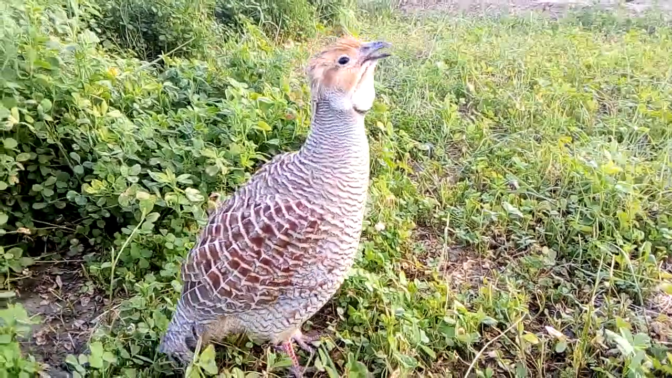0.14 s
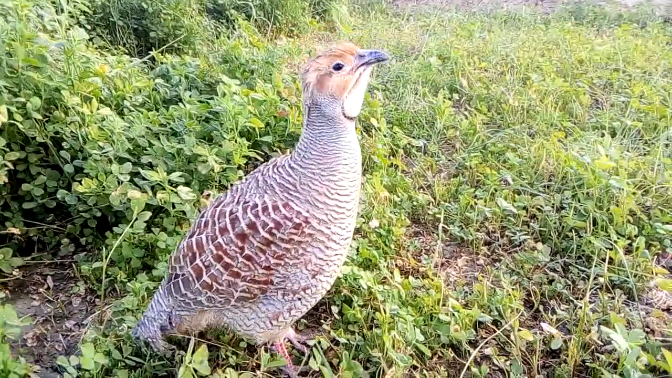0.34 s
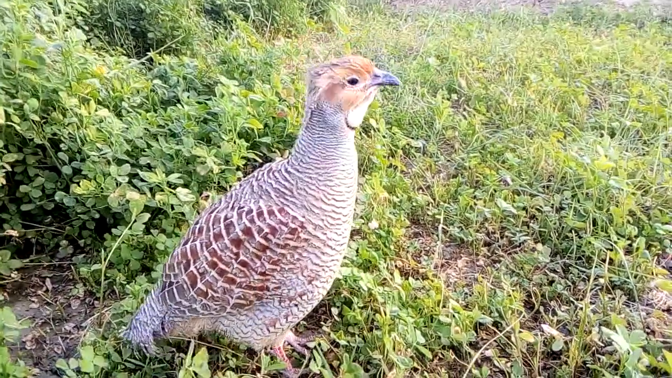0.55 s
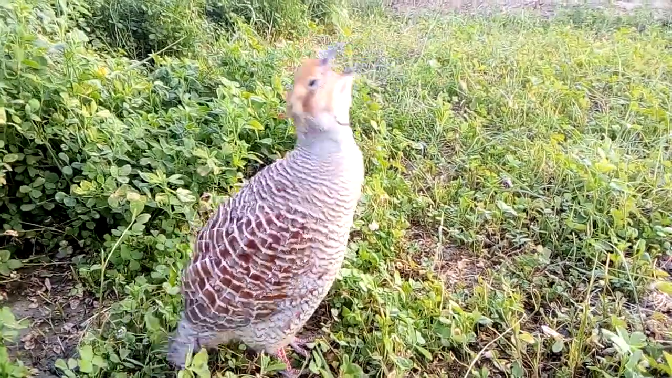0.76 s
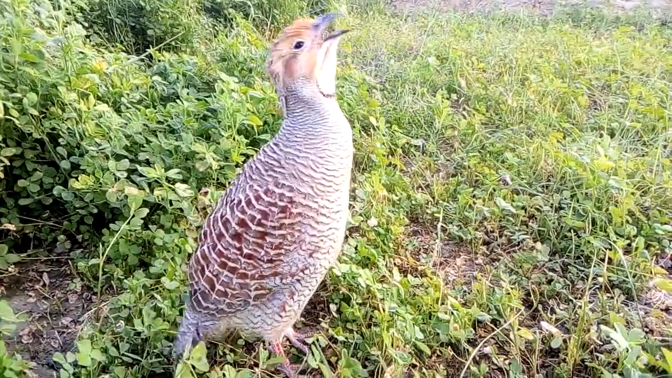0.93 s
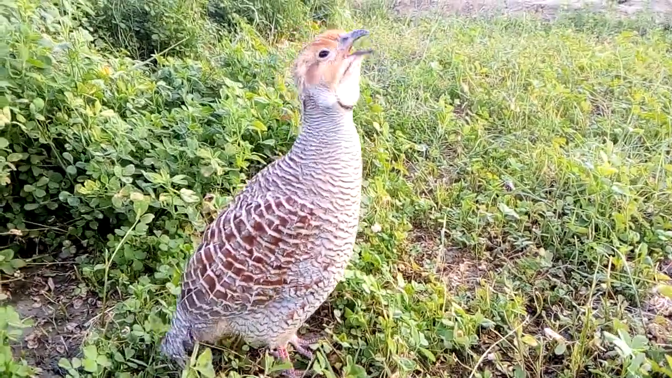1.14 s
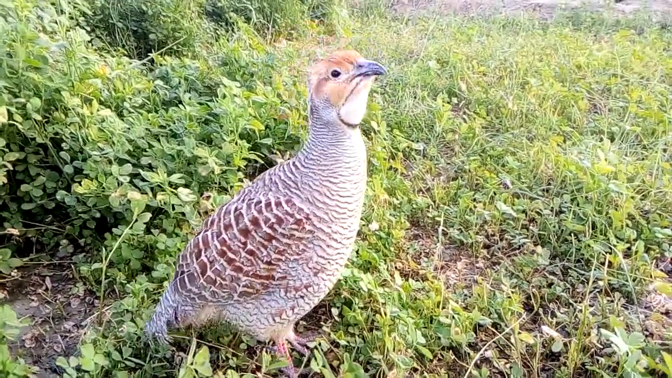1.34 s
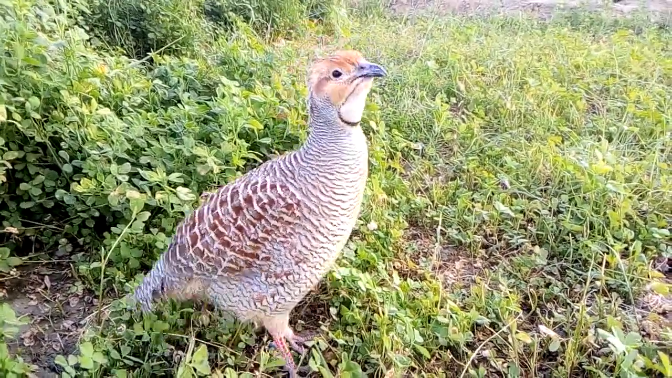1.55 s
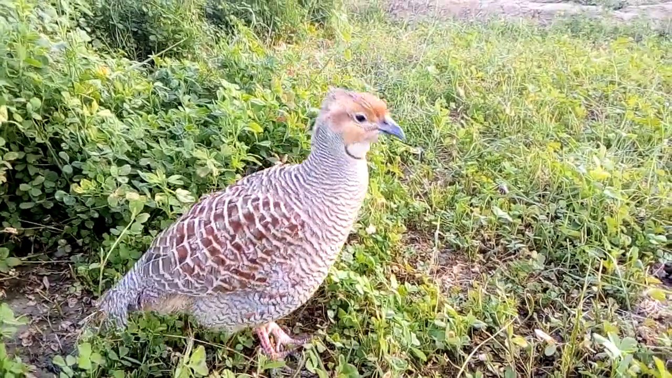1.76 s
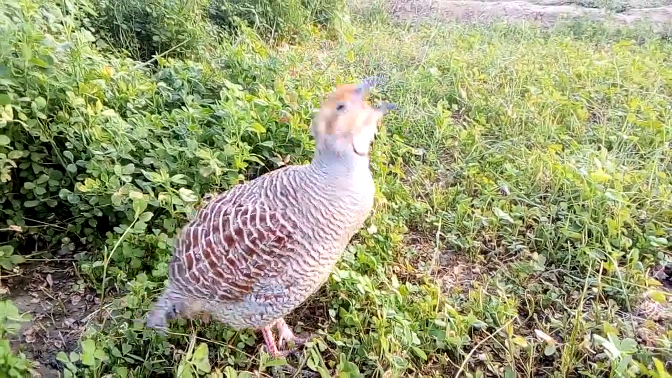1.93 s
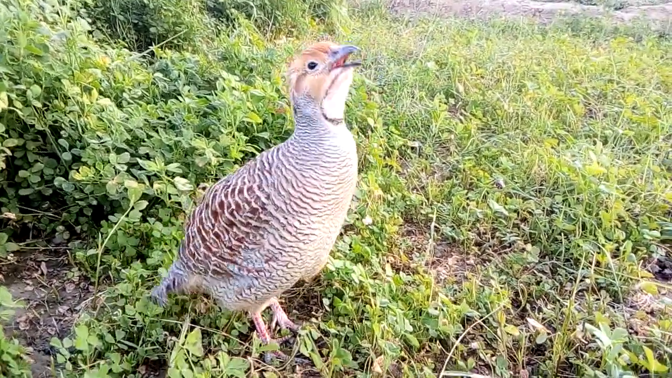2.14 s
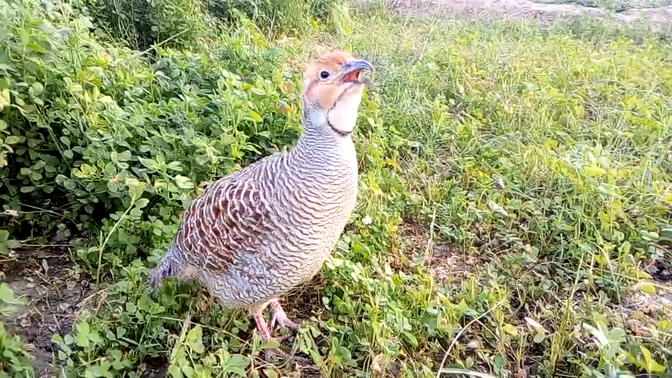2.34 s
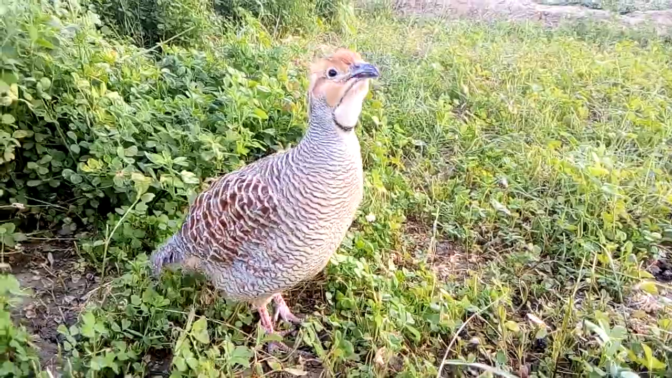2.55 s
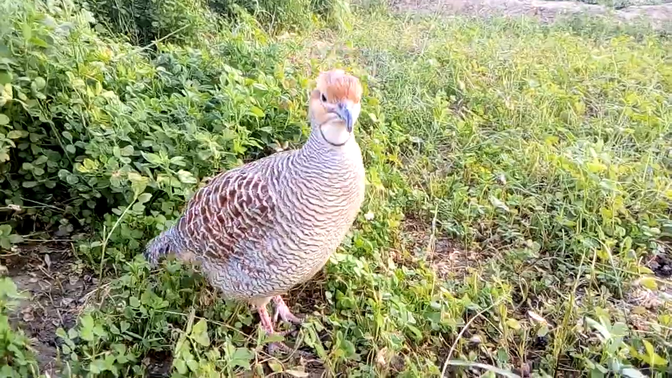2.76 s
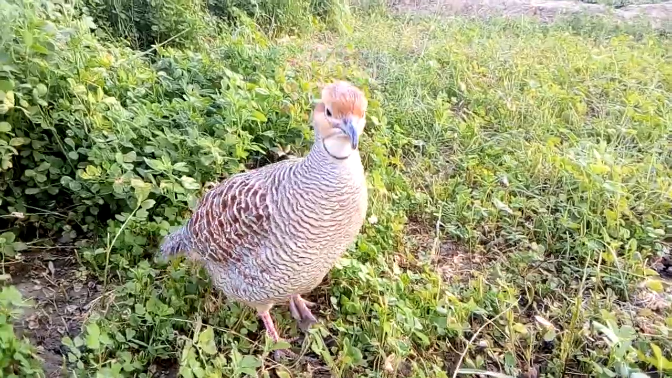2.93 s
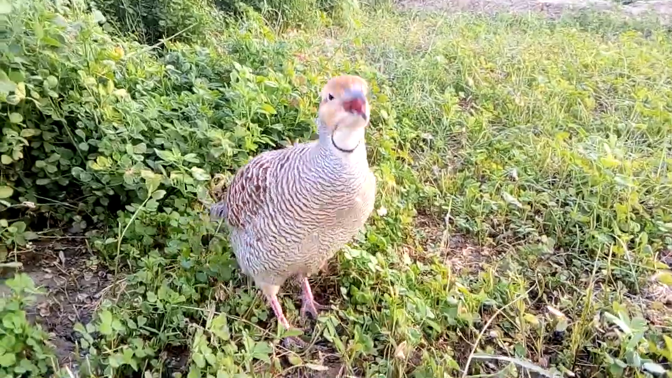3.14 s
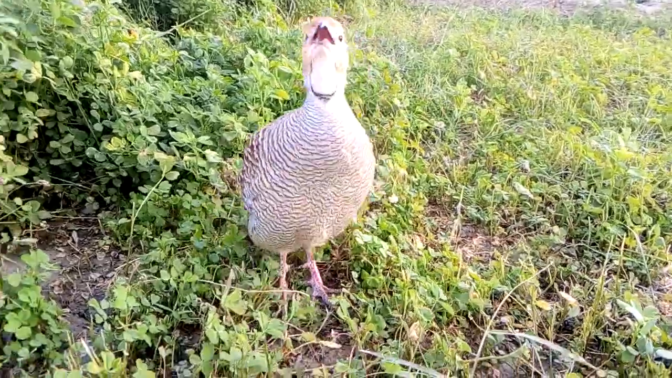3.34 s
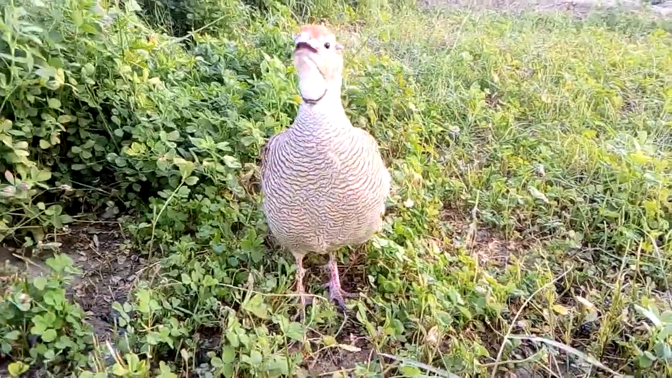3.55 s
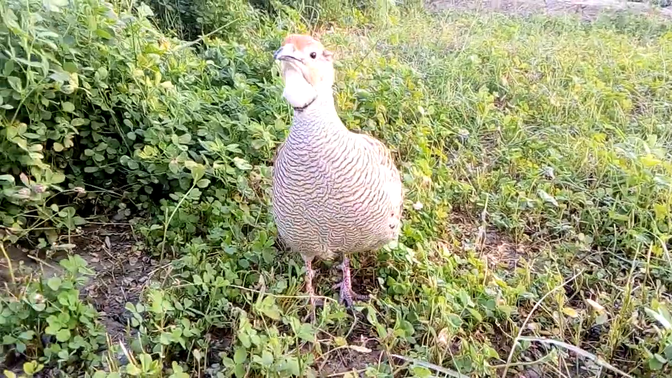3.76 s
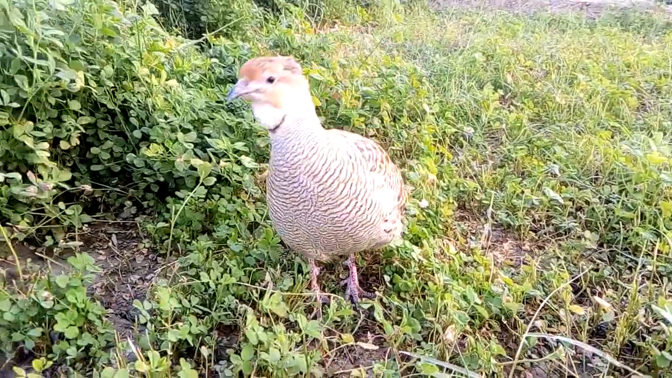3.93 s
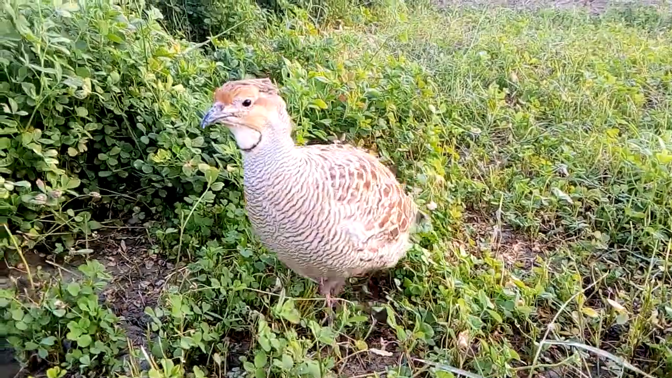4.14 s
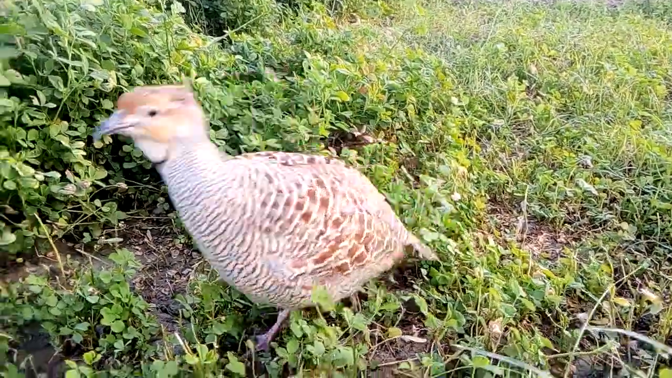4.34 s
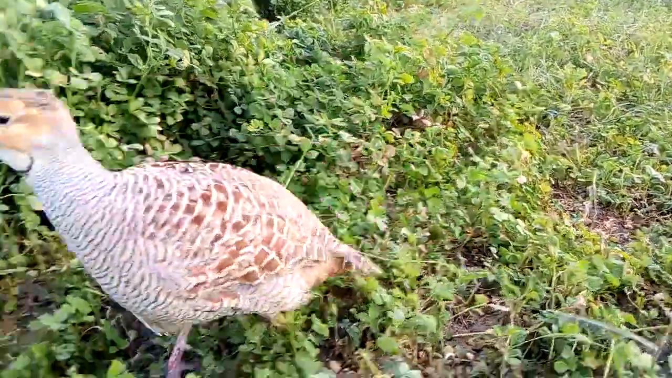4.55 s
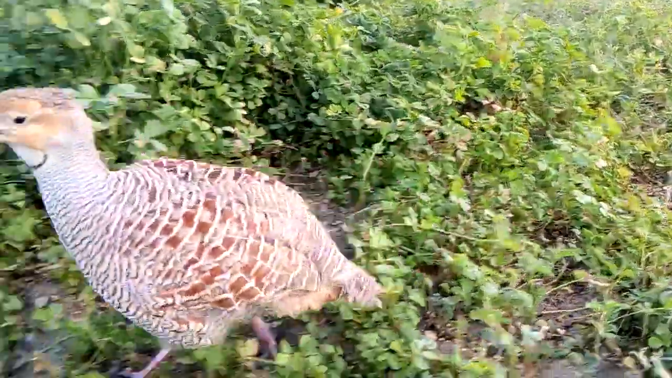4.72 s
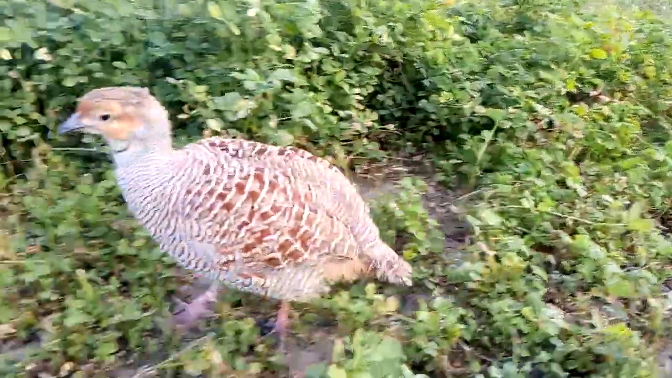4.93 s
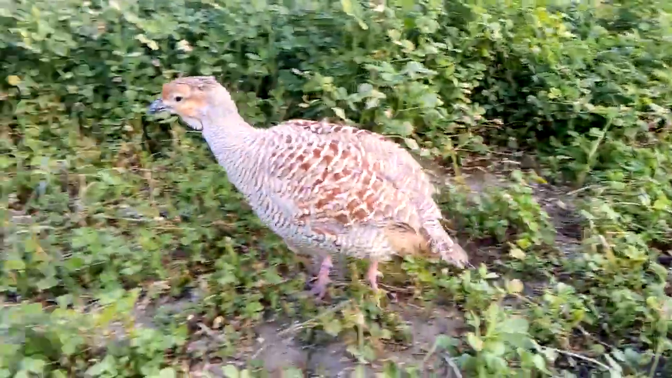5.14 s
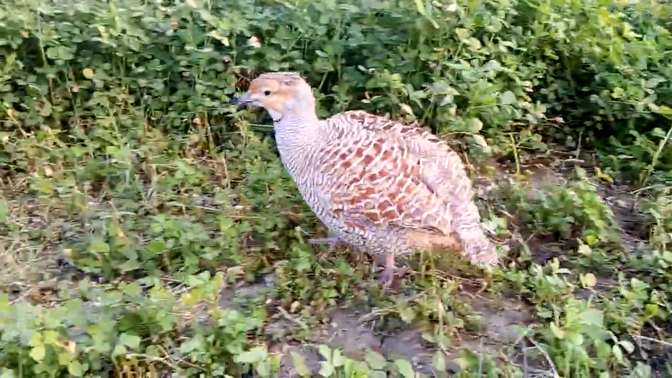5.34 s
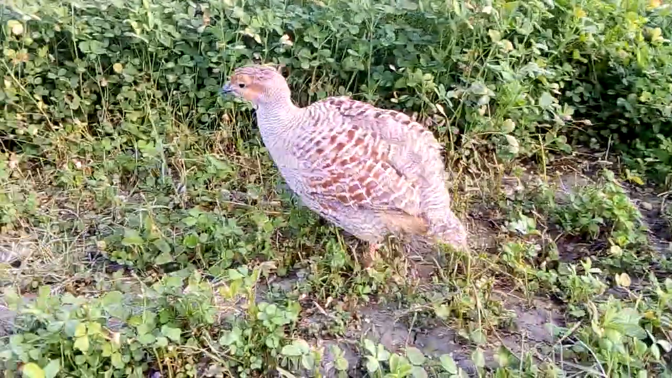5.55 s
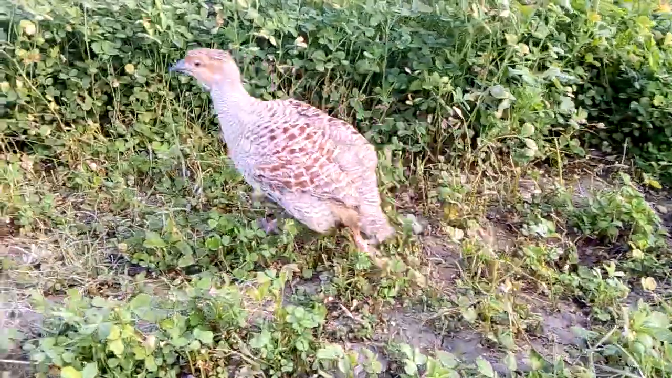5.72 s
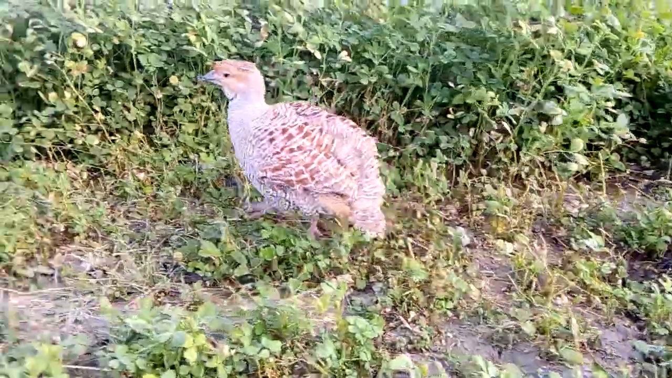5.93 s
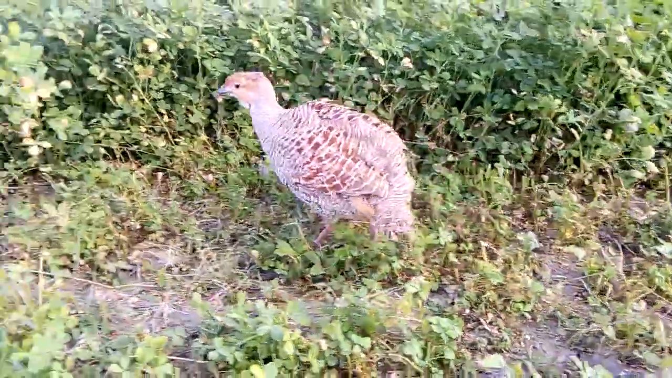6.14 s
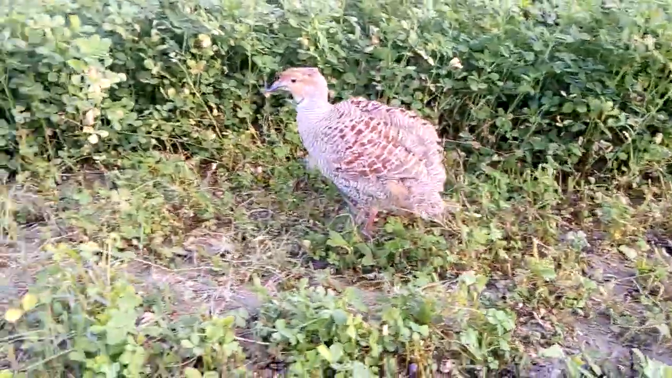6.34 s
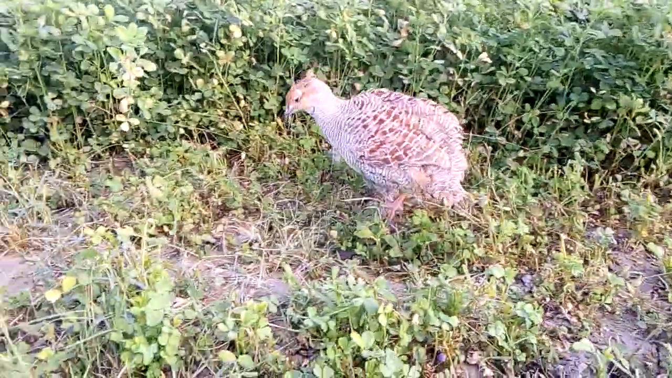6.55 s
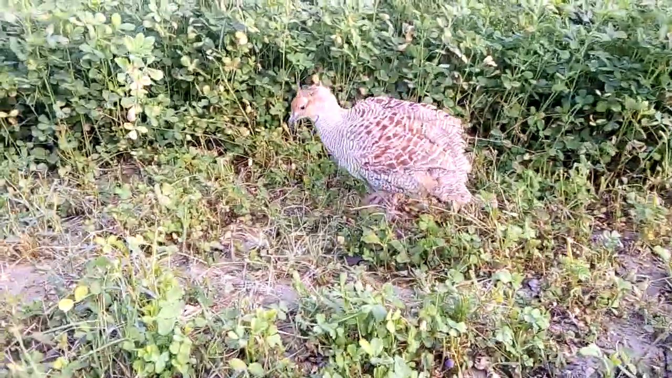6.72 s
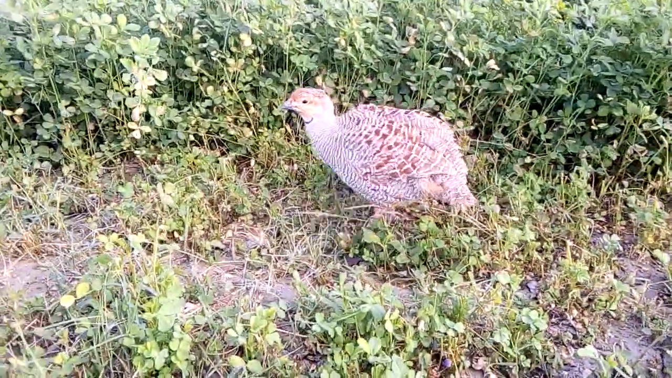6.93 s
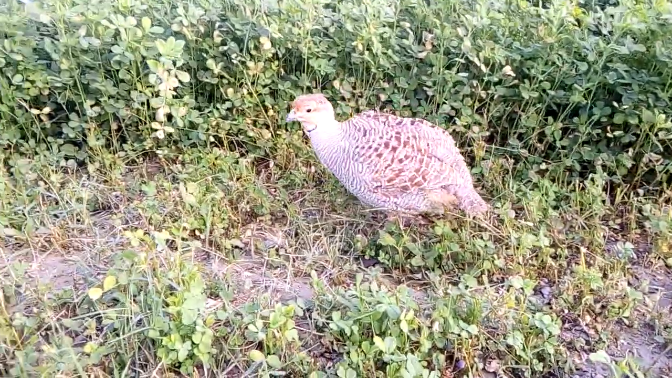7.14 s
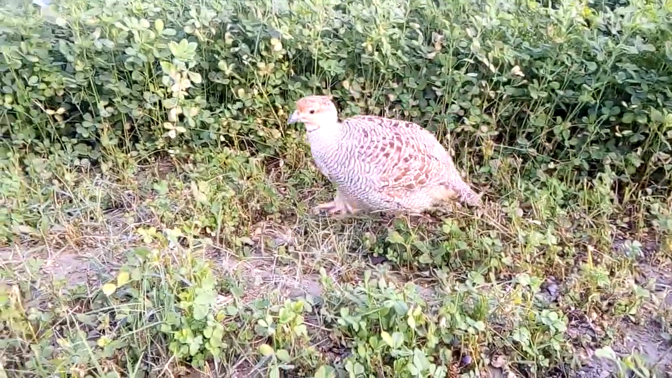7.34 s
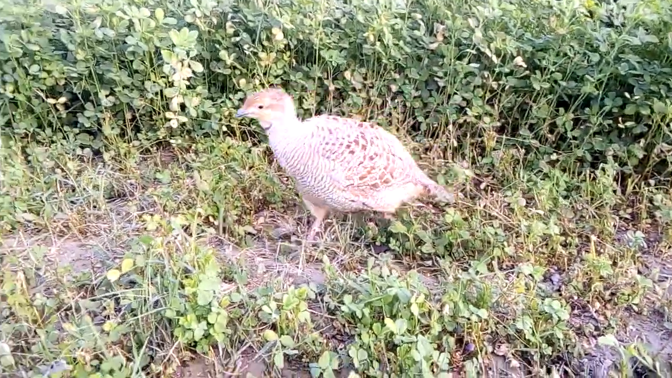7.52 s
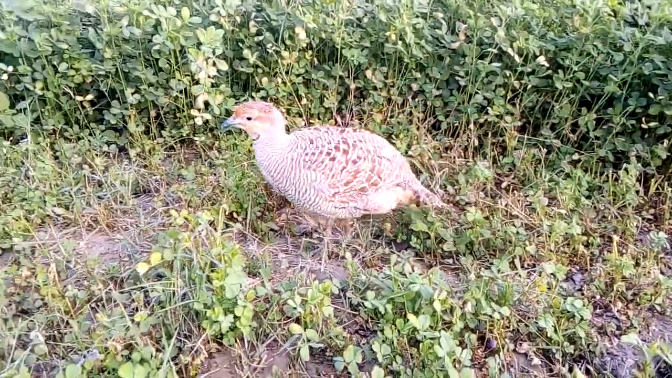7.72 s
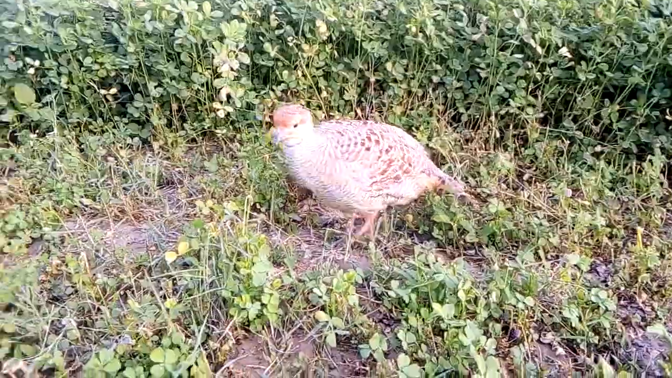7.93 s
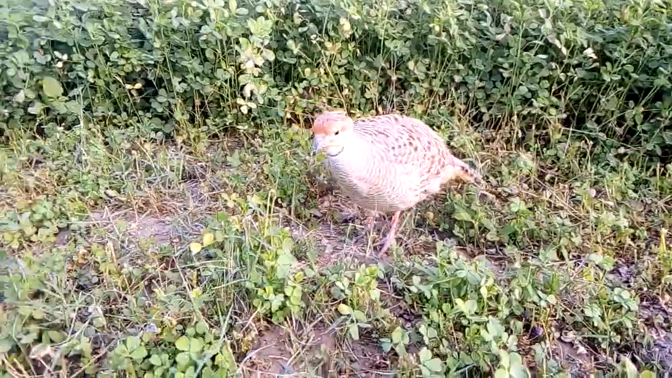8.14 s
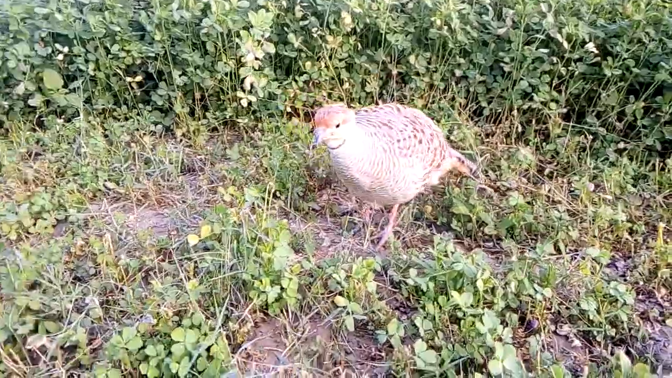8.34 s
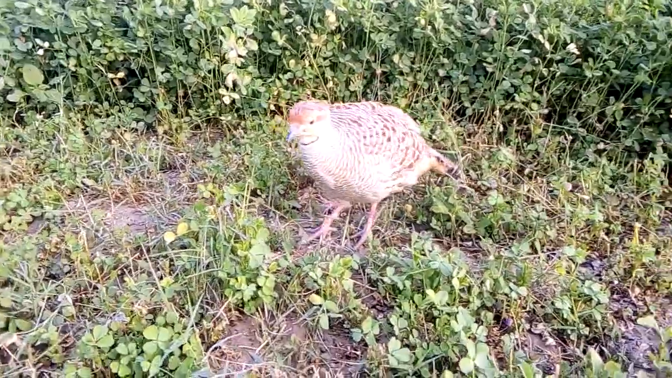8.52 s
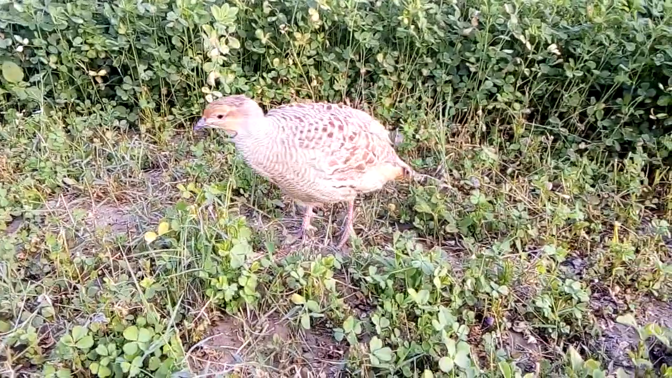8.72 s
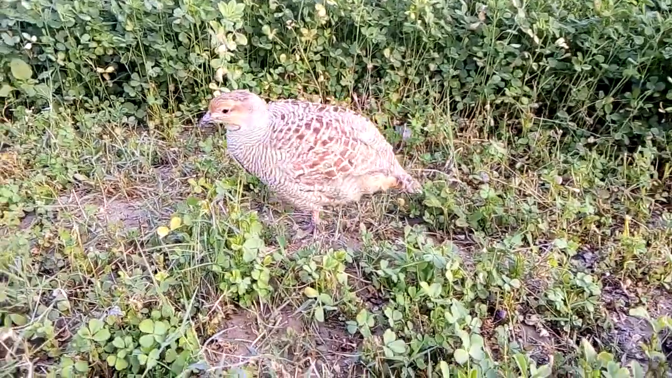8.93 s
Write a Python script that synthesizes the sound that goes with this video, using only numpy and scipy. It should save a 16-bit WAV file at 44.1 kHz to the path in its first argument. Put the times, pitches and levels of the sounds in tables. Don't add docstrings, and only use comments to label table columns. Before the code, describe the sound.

A partridge-like bird calls loudly and close in low weeds. Three times it gives four quick arched clucks, a thin breathy whistle and a squawk flipping between rasp and clear squeal. Four last clucks lead to lone piercing whistles, with soft closed-beak warbles between. Leaves rustle, twigs tick, a light breeze rumbles, and tiny birds twitter far off. Small microphone, open air, short echo from a hedge, slight roughness on the loudest notes.

```python
import sys
import numpy as np
from scipy import signal
from scipy.fft import rfft, irfft
from scipy.io import wavfile
from scipy.ndimage import uniform_filter1d

SR = 44100
rng = np.random.default_rng(int(sys.argv[2]) if len(sys.argv) > 2 else 0)


def unload_audio(sound):
    columns = np.transpose(np.atleast_2d(sound))
    steps = np.round(np.clip(columns, -1, 1) * 32767)
    wavfile.write(sys.argv[1], SR, steps.astype(np.int16))


def boost_factor(decibels):
    exponent = np.asarray(decibels, float) / 20
    return 10 ** exponent


N = 400428


def colour(points, hz):
    points = np.array(points)
    return boost_factor(np.interp(np.log(hz), np.log(points[:, 0]), points[:, 1]))


def shaped(points, size):
    spectrum = rfft(rng.standard_normal(size))
    noise = irfft(spectrum * colour(points, np.fft.rfftfreq(size, 1 / SR) + 1), size)
    return noise / noise.std()


def drift(rate_hz, size):
    r = np.exp(-2 * np.pi * rate_hz / SR)
    settle = 9000
    slow = signal.lfilter([1], [1, -2 * r, r * r], rng.standard_normal(size + settle))[settle:]
    return slow / slow.std()


def patchy(points, edges_hz, rate_hz, shared_db, own_db):
    noise, shared = rfft(shaped(points, N)), drift(rate_hz, N)
    hz = np.fft.rfftfreq(N, 1 / SR)
    total = 0
    for low, high in zip(edges_hz, edges_hz[1:]):
        band = irfft(noise * ((low <= hz) & (hz < high)), N)
        total = total + band * boost_factor(shared_db * shared + own_db * drift(rate_hz, N))
    return total


def span(start, end, attack_s, release_s):
    t = np.arange(round(start * SR), round(end * SR)) / SR
    edge = np.minimum((t - start) / attack_s, (end - t) / release_s)
    return t, np.abs(t - start) / (end - start), np.sin(np.pi / 2 * np.clip(edge, 0, 1)) ** 2


def unroll(rows, size, edge_s=0.0023):
    s, *columns = np.transpose(rows)
    t, u, gate = span(s[0], s[-1], edge_s, edge_s)
    curves = [uniform_filter1d(np.interp(t, s, c), size=size, mode="nearest") for c in columns]
    return t, gate, curves


def add(track, t, sound):
    at = round(t[0] * SR)
    track[at:at + len(sound)] += sound[:N - at]


def tone(hz, levels_db, shimmer_db):
    phase = 2 * np.pi * np.cumsum(hz) / SR
    wave = sum(-boost_factor(db) * np.cos(k * phase) for k, db in enumerate(levels_db, 1))
    return np.sqrt(2) * wave * boost_factor(shimmer_db * drift(200, len(hz)))


# f/Hz, level per Hz/dB
AIR_COLOUR = [(530, -32), (900, -6), (1320, -3), (1490, 2), (4010, 2), (6330, -3), (8870, -37.5),
              (13500, -19.5), (16000, -15)]


def open_air():
    edges_hz = [0, 1300, 2200, 3200, 4500, 6500, 10000, SR]
    return boost_factor(-65) * patchy(AIR_COLOUR, edges_hz, rate_hz=5, shared_db=1.0, own_db=3.5)


# f/Hz, level per Hz/dB
LEAF_COLOUR = [(590, -34), (1000, -6.5), (1830, -0.5), (2840, -1), (3710, 3.5), (6860, -3), (10800, -30),
               (13400, -25), (15100, -28), (16000, -30.5)]
# t/s, level/dB
STIRRING = [(.6, -70), (1.7, -71.5), (2.9, -59.5), (4.08, -66.5), (5.08, -71), (5.4, -68), (5.95, -64),
            (6.08, -58.5), (6.3, -63.5), (6.54, -56), (6.59, -49), (6.97, -57), (7.3, -66.5), (7.65, -60.5),
            (8.1, -68.5), (8.45, -56.5), (8.65, -60.5), (8.85, -58)]


def leaves(track):
    t = np.arange(N) / SR
    edges_hz = [0, 1300, 2200, 3200, 4500, 6500, 10000, SR]
    grain_db = 2.4 * drift(400, N)
    level = boost_factor(np.interp(t, *np.transpose(STIRRING)) + 1.0 + grain_db)
    add(track, t, level * patchy(LEAF_COLOUR, edges_hz, rate_hz=14, shared_db=1.8, own_db=2.0))


# f/Hz, level per Hz/dB
BREEZE_COLOUR = [(18, -43), (30, -23), (70, 4), (217, 0), (613, -2.5), (717, -9.5), (900, -10),
                 (1170, -34.5), (1980, -120)]
# t/s, level/dB
GUST_LEVELS = [(.6, -67.5), (2.6, -59.5), (2.88, -55.5), (3.0, -64.5), (4.08, -55), (4.25, -67.5),
               (4.8, -61.5), (6.0, -63.5), (6.15, -59), (6.45, -63), (6.7, -55.5), (7.2, -62), (8.1, -60.5),
               (8.5, -55), (8.7, -61.5)]


def breeze(track):
    t = np.arange(N) / SR
    edges_hz = [0, 60, 110, 190, 330, 600, SR]
    level = boost_factor(np.interp(t, *np.transpose(GUST_LEVELS)) - 4.0)
    add(track, t, level * patchy(BREEZE_COLOUR, edges_hz, rate_hz=4, shared_db=1.5, own_db=2.4))


def earlier_squawk(track):
    t = np.arange(round(.05 * SR)) / SR
    add(track, t, tone(2400 + 0 * t, [-43, -53], shimmer_db=5) * boost_factor(-60 * t / .2))


# f/Hz, width/Hz, level/dB
THROAT_MODES = [(740, 1600, -17.5), (1433, 310, 9), (2425, 340, 11), (3276, 470, 5), (4007, 790, 1),
                (4666, 240, 2), (6146, 360, 4.5), (6940, 330, -16.5), (9700, 15000, -50),
                (15000, 1200, -61)]


def throat(hz, gape_db):
    closed_db = min(np.max(gape_db), 0)
    tract = np.array(THROAT_MODES, float)
    tract[1, 0] += 9 * closed_db
    modes = [boost_factor(db) / (1 + 1j * (hz - mode_hz ** 2 / hz) / width_hz) ** 2
             for mode_hz, width_hz, db in tract]
    modes[2] = modes[2] * boost_factor(.7 * np.minimum(gape_db, 0))
    modes[6] = modes[6] * boost_factor(0.4 * np.minimum(gape_db, 0))
    modes[0] = -modes[0] * boost_factor(-.2 * closed_db)
    return sum(modes[:-1]) / (1 + (hz / 10800) ** 8) + modes[-1]


def windpipe(x):
    size = len(x) + 100
    hz = np.fft.rfftfreq(size, 1 / SR)
    echo = .85 * np.clip(hz / 1200 - 1, 0, 1) * np.exp(-2j * np.pi * hz / 1780)
    return irfft(rfft(x, size) * (1 + echo), size)[:len(x)] / 1.3


def syrinx(hz, low_db, high_db, half_db, rough):
    size, rough = len(hz), np.clip(rough, 0, 1)
    turns = np.cumsum(hz * (1 + .018 * rough * drift(60, size))) / SR / 2
    turns = turns + .022 * rough * drift(200, size)
    order = np.arange(1, 33)[:, None]
    partial_hz = order * hz / 2
    gain = throat(partial_hz, high_db) * np.where(order % 2, boost_factor(half_db), 1)
    gain = gain * np.where(order > 1, 1, boost_factor(-20.5)) * (partial_hz < 16000)
    flicker = boost_factor(10 * rough * np.array([drift(60, size) for k in range(8)]))[order[:, 0] % 8]
    waves = np.real(gain * np.exp(2j * np.pi * order * turns)) * flicker

    air_hz = np.fft.rfftfreq(size, 1 / SR) + 1
    air = rfft(rng.standard_normal(size)) * throat(air_hz, np.mean(high_db))

    high = 1 / (1 + (2000 / partial_hz) ** 12)
    high_air = 1 / (1 + (2000 / air_hz) ** 12)
    chaos = .75 * rough ** 3
    out = 0
    for share, air_share, level_db in ((1 - high, 1 - high_air, low_db), (high, high_air, low_db + high_db)):
        power = (np.abs(share * gain * flicker) ** 2).sum(axis=0) / 2
        voiced = (share * waves).sum(axis=0) / np.sqrt(power)
        hiss = irfft(air * air_share, size)
        out = out + boost_factor(level_db) * (np.sqrt(1 - chaos) * voiced + np.sqrt(chaos) * hiss / hiss.std())
    jumps_db = 3.0 * np.minimum(rough, .6) * np.clip(drift(350, size), -2, 2)
    return windpipe(out * boost_factor(jumps_db))


# t/s, length/s, f at the apex/Hz, level of low partials/dB, gape (high partials over low)/dB
CLUCK_CALLS = [(0.029, 0.086, 1303, -28.5, 15.5), (0.156, 0.087, 1267, -23, 7),
               (0.302, 0.077, 1078, -21, 1.5), (0.46, 0.076, 761.6, -19, -13.5),
               (1.073, 0.085, 1283, -29, 15), (1.199, 0.085, 1146, -24, 4.5),
               (1.339, 0.083, 1121, -23.5, 2), (1.503, 0.077, 812.6, -20, -14.5),
               (2.252, 0.088, 1406, -27, 14), (2.386, 0.077, 1203, -22.5, 5),
               (2.52, 0.071, 1038, -19, -3.5), (2.696, 0.08, 686, -21.5, -15),
               (3.51, 0.086, 1260, -27, 13.5), (3.638, 0.079, 1166, -19.5, 1),
               (3.778, 0.08, 881.6, -19.5, -9), (3.945, 0.074, 564.6, -26, -26)]
# apex as share of length, half-pitch level once doubled/dB, peak gape over apex/dB
CLUCK_ARCHES = [(.52, 4.5, -0.5), (.55, 7, 1.5), (.55, -2, 3), (.48, -14.5, -4)]
# bend of the rise/(1/s), bend of the fall/(1/s)
CLUCK_BENDS = [(17, 15), (16, 18), (15, 19), (17, 17)]


def clucks(track):
    for k, (start, length, apex_hz, low_db, gape_db) in enumerate(CLUCK_CALLS):
        share, half_db, opening_db = CLUCK_ARCHES[k % len(CLUCK_ARCHES)]
        rise, fall = CLUCK_BENDS[k % len(CLUCK_ARCHES)]
        attack_s = np.interp(apex_hz, [1000, 1300], [0.011, 0.015])
        t, u, gate = span(start, start + length, attack_s, release_s=0.033)
        past = t - start - share * length
        bend = np.where(past < 0, rise, fall) * past
        hz = apex_hz / np.sqrt(1 + 3 * bend ** 2 + 2.5 * bend ** 4)
        doubling_db = half_db - 18.0 / (1 + np.exp((past + .006) / .008))
        ragged = .55 * np.interp(u, [.04, .18, .66, .84], [1, 0, 0, 1])
        ragged = ragged + .34 * np.clip((apex_hz - 500) / 500, .3, 1.25)
        closing_db = -21.5 + 0.16 * gape_db
        high_db = np.interp(u, [0, .3, .5, .85], [gape_db - 10.5, gape_db + opening_db, gape_db, closing_db])
        closed_low_db = low_db - 0.48 * np.minimum(high_db - gape_db, 0) * (u > .5)
        add(track, t, gate * syrinx(hz, closed_low_db, high_db, doubling_db, ragged))


# delay t/s, level/dB
HARD_ECHOES = [
    (0.045, -35),
    (.085, -40.5),
    (0.125, -38),
    (.135, -38),
    (0.176, -42.5),
    (0.207, -46.5),
]


def hedge(x):
    t = np.arange(round(.6 * SR)) / SR
    near = boost_factor(-34 - 60 * t / 0.36) * np.clip(t / 0.0066, 0, 1)
    bank_s = 0.08
    far = boost_factor(-53.5 - 60 * np.abs(t - bank_s) / np.where(t < bank_s, .15, .9))
    plants = [(300, -23.5), (1600, -16), (2300, .5), (3000, -4), (6000, -4), (12000, -20)]   # f/Hz, level/dB
    echo = shaped(plants, len(t)) * (near + far) / 30
    taps = np.zeros(len(t))
    for delay, db in HARD_ECHOES:
        taps[round(delay * SR)] = boost_factor(db)
    echo += signal.sosfilt(signal.butter(2, [2000, 9000], "band", fs=SR, output="sos"), taps)
    return signal.fftconvolve(x, echo)[:N]


# t/s, peak level/dB, f/Hz
TWIG_SNAPS = [(0.4492, -56, 1510), (1.491, -29, 1470), (2.6755, -51, 1560), (4.0243, -37, 3750),
              (4.8595, -32, 1630), (5.385, -40.5, 4230), (6.5656, -30.5, 4830), (6.5654, -28, 2680),
              (6.8217, -35, 4300), (6.912, -39, 2480), (6.489, -41, 4500), (8.147, -46, 4970),
              (8.154, -61, 2520), (7.674, -42.5, 1680), (7.673, -47, 5080), (8.519, -40, 4700)]


def twigs(track):
    t = np.arange(round(.15 * SR)) / SR
    for s, db, hz in TWIG_SNAPS:
        twig = signal.butter(2, [0.76 * hz, 1.1 * hz], "band", fs=SR, output="sos")
        crack = rng.standard_normal(len(t)) * boost_factor(-60 * t / 0.0087)
        add(track, [s], boost_factor(db + 11.5) * signal.sosfilt(twig, crack))


# t/s, length/s, f at start/Hz, f at end/Hz, level/dB
FAR_SLIDES = [(.53, .03, 3950, 3500, -54), (.558, .022, 3200, 2500, -58), (.579, .008, 2800, 4800, -62),
              (.59, .017, 3100, 2450, -58), (.606, .008, 3200, 4800, -62), (.598, .025, 4100, 3600, -62),
              (.615, .017, 3050, 2500, -58), (.631, .008, 3200, 4800, -61), (.638, .018, 3300, 2000, -59),
              (1.58, .014, 5600, 4000, -57), (1.592, .021, 4000, 3400, -54), (1.612, .012, 3900, 3900, -58),
              (1.615, .023, 3050, 2450, -55), (1.642, .021, 3500, 2350, -56), (1.641, .02, 3950, 3500, -60),
              (1.655, .024, 4100, 3500, -57), (1.668, .021, 3100, 2450, -55), (1.69, .032, 4000, 1650, -57),
              (1.706, .013, 4600, 3500, -61), (1.72, .016, 3900, 3750, -62), (1.743, .014, 3800, 2800, -59),
              (1.76, .018, 3700, 2300, -60), (1.778, .01, 4300, 3200, -61), (1.8, .016, 2300, 1800, -55),
              (2.615, .022, 3700, 3700, -54), (2.8, .008, 4850, 3700, -50), (3.017, .033, 2340, 1800, -56),
              (3.017, .029, 4190, 3200, -50.5), (5.14, .017, 5100, 3900, -64),
              (5.58, .021, 5400, 4100, -70), (5.638, .025, 5440, 4100, -68)]


def twitter(track):
    for s, length, start_hz, end_hz, db in FAR_SLIDES:
        u = np.linspace(0, 1, round(length * SR))
        hz = end_hz + (start_hz - end_hz) * (1 - u) ** 1.7
        add(track, [s], np.sin(np.pi * u) ** .6 * tone(hz, [db + 3], shimmer_db=1.5))


def chirp(track, start, db, top_hz, length, rise_hz):
    t, u, gate = span(start, start + length, attack_s=0.24 * length, release_s=0.34 * length)
    add(track, t, gate * tone(top_hz - rise_hz * (1 - u), [db], shimmer_db=2.5))


# f/Hz, level per Hz/dB
BREATH_COLOUR = [(1150, -41.5), (1350, -8), (1650, -4.5), (2050, -28), (2700, 1), (4200, 3), (4750, -7.5),
                 (7500, -14.5), (8500, -36.5), (12500, -54)]
# start t/s, end t/s, breath level/dB, chirp top f/Hz, chirp level/dB
WHISTLE_BREATHS = [
    (0.655, 0.838, -43, 3260, -32.5),
    (1.803, 1.987, -37.5, 3275, -30),
    (3.045, 3.239, -37, 3326, -28),
    (4.353, 4.573, -34, 3470, -22.5),
    (5.661, 5.892, -32.5, 3094, -32.5),
    (7.805, 8.05, -35.5, 3547, -19.5),
    (8.89, 9.15, -34, 3400, -23.5),
]


def breaths(track):
    low_pass = signal.butter(4, 2100, fs=SR, output="sos")
    for start, end, db, top_hz, chirp_db in WHISTLE_BREATHS:
        chirp(track, start + 0.016, chirp_db, top_hz, length=0.027, rise_hz=609)
        chirp(track, start + 0.0032, chirp_db - 16, top_hz=2780, length=0.022, rise_hz=352)
        t, u, gate = span(start, end, attack_s=0.045, release_s=0.03)
        air = shaped(BREATH_COLOUR, len(t))
        low = signal.sosfiltfilt(low_pass, air)
        air = air - low * np.clip(1.5 * u - .6, 0, 1)
        add(track, t, gate * boost_factor(db + 2.5 - 2 * u + 1.4 * drift(60, len(t))) * air)


def whistle(track, row, db, swell_db, swell_s, sag_db):
    start, end, hold_hz, sag_hz, flick_hz = row
    t, u, gate = span(start, end, attack_s=0.0016, release_s=0.0023)
    flick = np.clip(1 - (end - t) / 0.07, 0, 1) ** 3.3
    sag = np.sin(np.pi / 2 * np.clip((t - start - 0.089) / 0.042, 0, 1)) ** 2
    scoop_hz = 271.3 * np.exp((start - t) / 0.019)
    hz = hold_hz - scoop_hz - sag_hz * sag + flick_hz * flick
    flick_fade_db = -23.5 * flick * min(abs(flick_hz) / 600, 1)
    db = db + swell_db * np.exp((start - t) / swell_s) + sag_db * u ** 2 + flick_fade_db
    add(track, t, gate * tone(hz, [db, db - 30.5], shimmer_db=0.88))


# start t/s, end t/s, held f/Hz, sag f/Hz, closing flick f/Hz
LEADS = [
    (0.677, 0.795, 3000, -31.5, -2.5),
    (1.845, 1.975, 2922, 22.5, -56.5),
    (3.073, 3.231, 2906, 26, 522),
]


def lead_whistles(track):
    for row in LEADS:
        whistle(track, row, db=-16.5, swell_db=-14.0, swell_s=0.0013, sag_db=1.5)


SQUEAL_LEVELS = [-51.5, -1, -50, -1.5, -46.5, -10.5, -58.5, -38, -65.5, -51, -66.5, -41.5]


def squeal(track, start, end, end_hz, db, fade_db, power):
    release_s = np.clip(.2 * (end - start), 0, .012)
    t, u, gate = span(start, end, attack_s=0.006, release_s=release_s)
    hz = 2446 + (end_hz - 2446) * u ** power - 70 * np.exp((start - t) / 0.0042)
    levels_db = [db + fade_db * u ** 2 + partial_db for partial_db in SQUEAL_LEVELS]
    off_db = 0.037 * np.clip(2330 - hz, 0, None)
    dip_db = 10.0 * np.exp(-((hz - 2200) / 60) ** 2)
    levels_db[3] = levels_db[3] - off_db - dip_db
    linger_db = 20.0 * np.exp((start - t) / 0.067)
    levels_db[::2] = [level_db + linger_db for level_db in levels_db[::2]]
    add(track, t, gate * tone(hz / 2, levels_db, shimmer_db=.5))


# start t/s, first clean flip t/s, long squeal start t/s, long squeal end t/s, level/dB
SQUAWK_CALLS = [
    (0.793, 0.835, .88, .953, -13.5),
    (1.979, 2.022, 2.068, 2.136, -13),
    (3.239, 3.29, 3.33, 3.389, -11.5),
]
SQUEAL_SAGS = [
    1.8,
    1.7,
    1.35,
]
# start f/Hz, middle f/Hz, end f/Hz
RASP_GLIDES = [
    (1180, 1400, 1170),
    (1200, 1120, 1180),
    (1200, 1220, 1220),
    (1400, 1200, 900),
]
# low partials level/dB, high partials over low/dB, extra top level/dB
RASP_BALANCE = [
    (-30.5, 13, -0.5),
    (-39, 12, 4.5),
    (-32, 15.5, -3),
    (-32, 5.5, -7),
]
RASP_LET_GO = [
    .004,
    .003,
    .022,
    .018,
]


def squawks(track):
    top = signal.butter(2, 4600, "high", fs=SR, output="sos")
    overlap_s, break_s = 0.0082, 0.015
    for (start, flip, again, end, db), power in zip(SQUAWK_CALLS, SQUEAL_SAGS):
        rough = [(start, flip + overlap_s),
                 (again - break_s - overlap_s, again),
                 (again - 0.0037, again + 0.019),
                 (end - overlap_s, end + 0.03)]
        stretches = zip(rough, RASP_GLIDES, RASP_BALANCE, RASP_LET_GO)
        for (t0, t1), pitch_hz, (low_db, high_db, top_db), release_s in stretches:
            t, u, gate = span(t0, t1, attack_s=0.004, release_s=release_s)
            hz = uniform_filter1d(np.interp(u, [0, .35, 1], pitch_hz), size=150, mode="nearest")
            rasp = syrinx(hz, low_db, high_db, half_db=-5.5, rough=.63)
            add(track, t, gate * (rasp + boost_factor(top_db) * signal.sosfiltfilt(top, rasp)))
        squeal(track, flip, again - break_s, end_hz=2360, db=db + 1, fade_db=-2.0, power=1.9)
        squeal(track, again, end, end_hz=2000, db=db, fade_db=-4, power=power)


# t/s, peak level/dB, f/Hz, time to fall 60 dB/s
FOOTFALLS = [(2.849, -66, 193, 0.065), (3.058, -31, 122.3, 0.028), (4.072, -32, 139.4, 0.03),
             (4.345, -41, 144, 0.078), (5.665, -27, 343, 0.024), (7.097, -38, 82, 0.037),
             (7.797, -35, 338, 0.049), (8.487, 3.5, 270, 0.0046), (8.885, -33, 336, 0.1),
             (8.899, -28, 132.5, 0.043), (7.811, -29, 106, 0.022)]


def footfalls(track):
    t = np.arange(round(.15 * SR)) / SR
    for s, db, hz, t60 in FOOTFALLS:
        ring = np.sin(2 * np.pi * hz * t) * boost_factor(-60 * t / t60)
        add(track, [s], boost_factor(db - 7) * ring * np.clip(t / .002, 0, 1))


# t/s, f/Hz, level/dB
LONE_WHISTLES = [
    [(4.385, 2870, -36), (4.393, 2787, -24.5), (4.411, 2904, -19), (4.441, 2980, -14), (4.509, 2900, -22.5),
     (4.533, 3010, -19.5), (4.547, 3400, -26.5), (4.557, 3000, -66)],
    [(7.845, 2848, -32.5), (7.863, 2917, -19.5), (7.911, 2974, -14), (7.971, 2991, -13.5),
     (7.993, 3011, -17), (8.008, 3124, -21), (8.017, 3450, -27.5), (8.031, 3400, -41)],
    [(8.918, 2678, -11), (8.924, 2620, -19.5), (8.942, 2858, -18.5), (8.966, 2916, -14),
     (9.05, 2850, -18.5), (9.079, 2938, -18)],
]
# t/s, f/Hz, level/dB
WAVERING = [(5.687, 2960, -25), (5.701, 2935, -10.5), (5.711, 3216, -21), (5.722, 3226, -11),
            (5.75, 3410, -15.5), (5.765, 3544, -28.5), (5.795, 3205, -12.5), (5.83, 3164, -11.5),
            (5.865, 3400, -16)]
# t/s, level/dB, top f/Hz, length/s, rise f/Hz
UPWARD_SLIP = (5.853, -21, 3800, .03, 320)
# t/s, level/dB, top f/Hz, length/s, rise f/Hz
LAST_PEEP = (8.028, -34, 4300, .022, 200)


def lone_whistles(track):
    for rows, octave_db in [(WAVERING, -22.5)] + [(rows, -29.5) for rows in LONE_WHISTLES]:
        t, gate, (hz, db) = unroll(rows, size=200)
        add(track, t, gate * tone(hz, [db, db + octave_db], shimmer_db=0.96))
    chirp(track, *UPWARD_SLIP)
    chirp(track, *LAST_PEEP)


# t/s, f/Hz
WARBLED_NOTES = [
    [(4.86, 1323), (4.872, 1410), (4.893, 1250), (4.915, 1540), (4.95, 1154), (4.99, 940), (5.002, 1036)],
    [(6.1, 1124), (6.127, 1006), (6.14, 1530), (6.16, 1467), (6.185, 1002), (6.255, 902)],
    [(7.065, 1267), (7.09, 1096), (7.105, 1534), (7.14, 1068), (7.165, 974), (7.215, 939), (7.25, 1545)],
    [(7.402, 1814), (7.414, 2190), (7.432, 2240), (7.455, 1820), (7.5, 1486), (7.535, 1223), (7.556, 1580)],
]
WARBLE_LEVELS = [
    -36,
    -45.5,
    -50,
    -47,
]
WARBLE_GAPES = [
    1.5,
    12,
    17.5,
    2,
]
# top t/s, top f/Hz, fall/s, low f/Hz, level/dB
FALLING_NOTES = [
    (5.197, 1728, 0.077, 1129, -40),
    (6.453, 1770, 0.072, 1135, -50.5),
    (7.751, 1838, 0.062, 1345, -49.5),
    (8.754, 1831, 0.11, 978, -47),
]
# f/Hz, level/dB
BEAK_COLOUR = [(900, -7), (1100, -11), (1500, 1.2), (1800, 0), (2300, -19), (3200, -24), (4100, -15),
               (5000, -31.5)]


def soft_notes(track):
    lift_s, hook_s = 0.03, 0.02
    notes = list(zip(WARBLED_NOTES, WARBLE_LEVELS, WARBLE_GAPES))
    for s, top_hz, fall, low_hz, db in FALLING_NOTES:
        middle_hz = low_hz + 0.29 * (top_hz - low_hz)
        rows = [(s - lift_s, top_hz), (s - lift_s / 2, .98 * top_hz), (s + 0.0022, top_hz),
                (s + 0.74 * fall, middle_hz), (s + .8 * fall, 1.05 * low_hz),
                (s + fall, low_hz), (s + fall + hook_s, 1.1 * low_hz)]
        notes.append((rows, db, 6.0))
    for rows, db, parted_db in notes:
        t, gate, (hz,) = unroll(rows, size=300, edge_s=.014)
        open_db = parted_db + 17 * np.clip((hz.max() - 1764) / 100, 0, 1)
        levels_db = []
        for k, source_db in enumerate([0, .3, 9, 20], 1):
            beak_db = 20 * np.log10(colour(BEAK_COLOUR, k * hz))
            beak_db = beak_db + (k > 1) * (open_db * (k * hz > 2600) - source_db)
            levels_db.append(db + uniform_filter1d(beak_db, size=600))
        add(track, t, gate * tone(hz, levels_db, shimmer_db=1.34))


def scene():
    bird, field = np.zeros(N), open_air()
    for voice in (earlier_squawk, clucks, breaths, lead_whistles, squawks, lone_whistles, soft_notes):
        voice(bird)
    bird = signal.sosfilt(signal.butter(4, 230, "high", fs=SR, output="sos"), bird)
    for source in (leaves, breeze, twigs, twitter, footfalls):
        source(field)
    return (bird + hedge(bird) + field)[None]


def top_cut(x):
    return signal.sosfilt(signal.butter(12, 15850, fs=SR, output="sos"), x)


def record(dry):
    thud = signal.sosfilt(signal.butter(2, [80, 220], "band", fs=SR, output="sos"), dry ** 2)
    ceiling, port_hz = .72, 15220
    bent = dry / (1 + (dry / ceiling) ** 6) ** (1 / 6)
    port = signal.butter(4, [port_hz - 800, port_hz + 700], "band", fs=SR, output="sos")
    bent = bent + boost_factor(9) * signal.sosfilt(port, bent)
    bent = signal.sosfilt(signal.butter(2, 45, "high", fs=SR, output="sos"), bent)
    return top_cut(bent + boost_factor(-32) * thud)


dry = scene()
out = record(dry)
unload_audio(out)
```